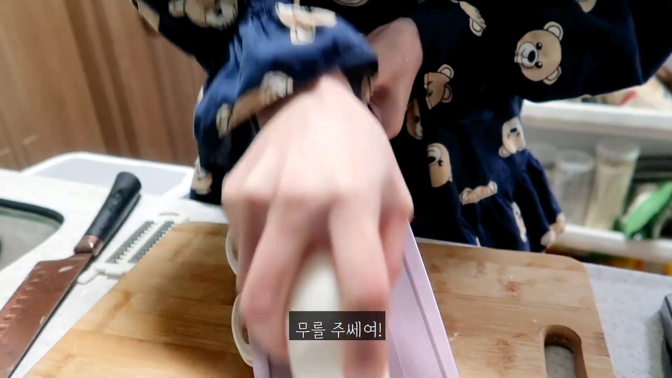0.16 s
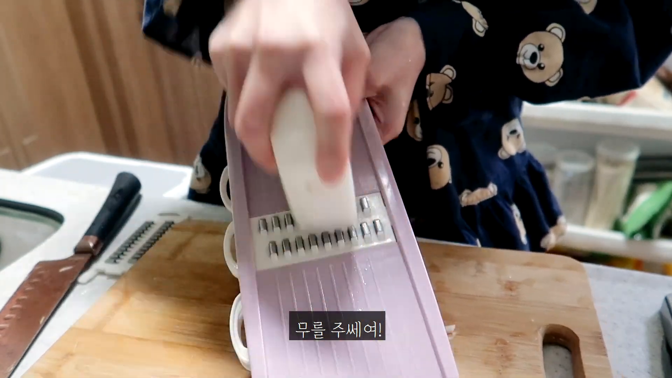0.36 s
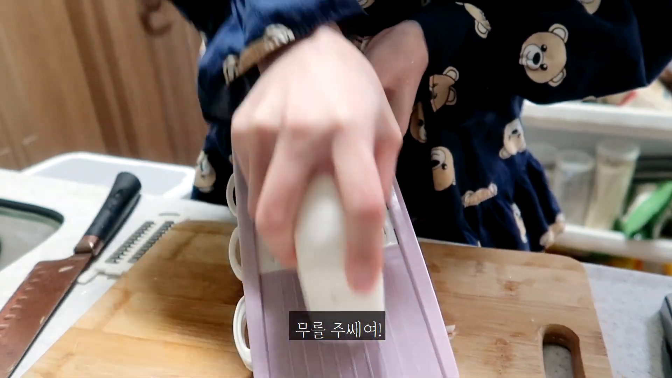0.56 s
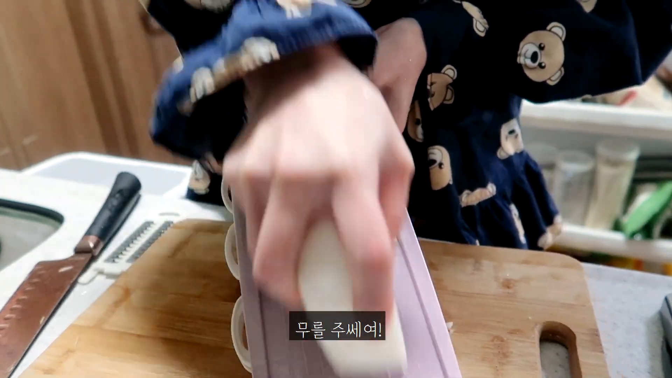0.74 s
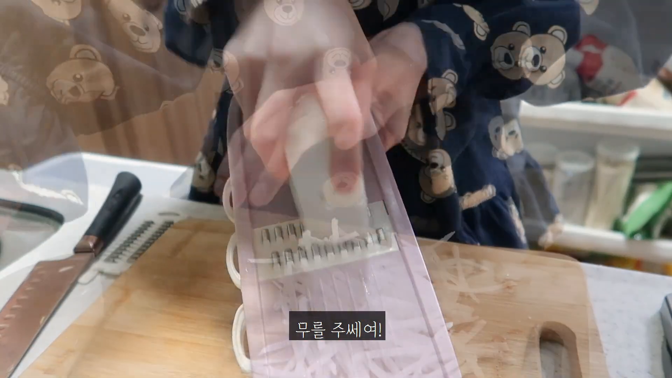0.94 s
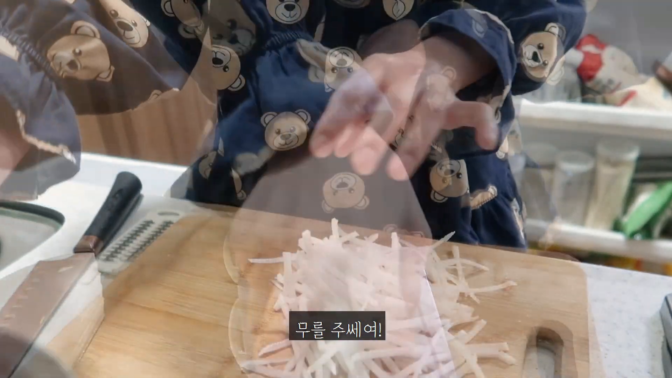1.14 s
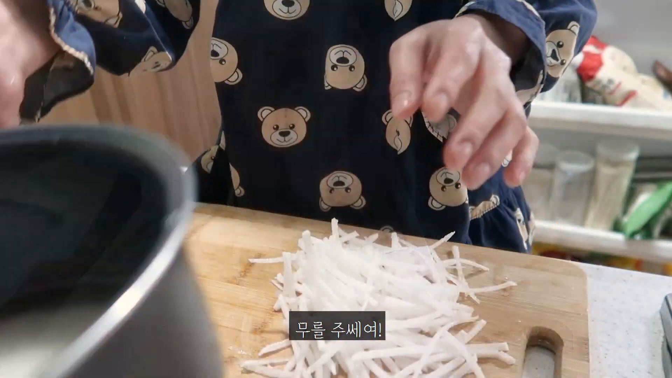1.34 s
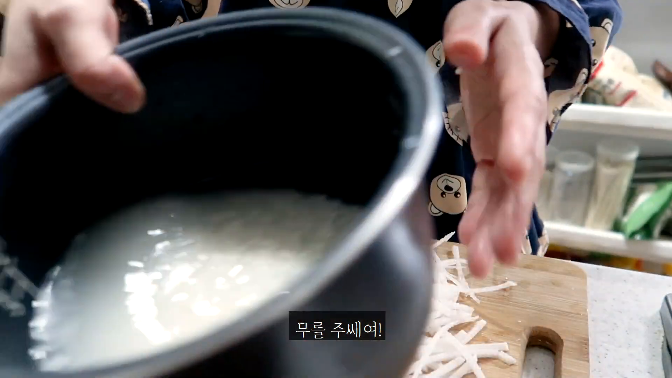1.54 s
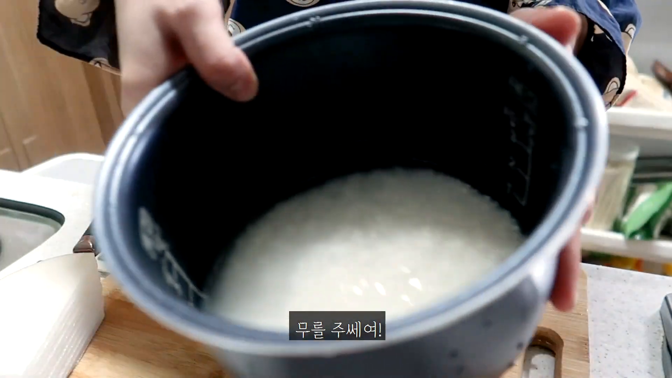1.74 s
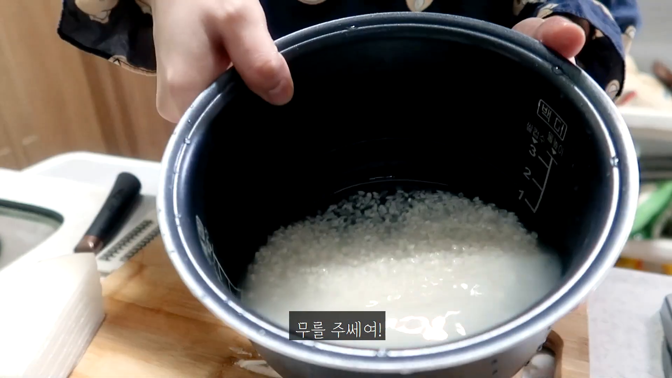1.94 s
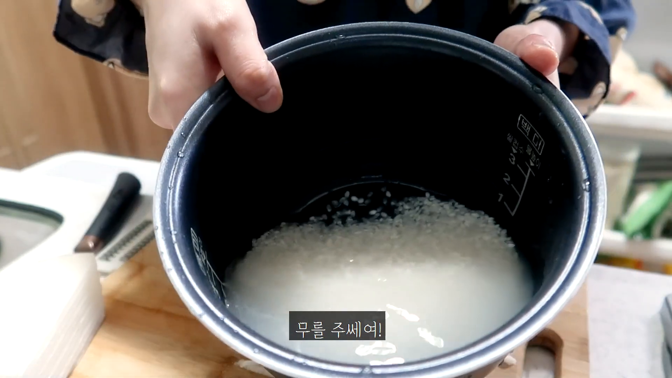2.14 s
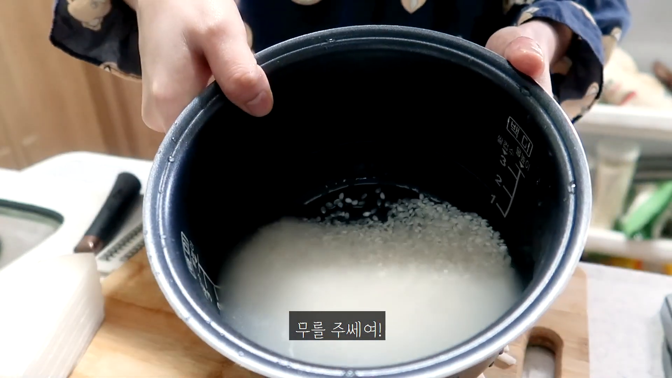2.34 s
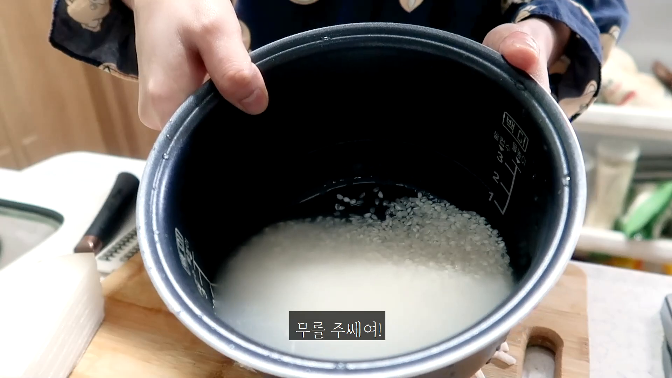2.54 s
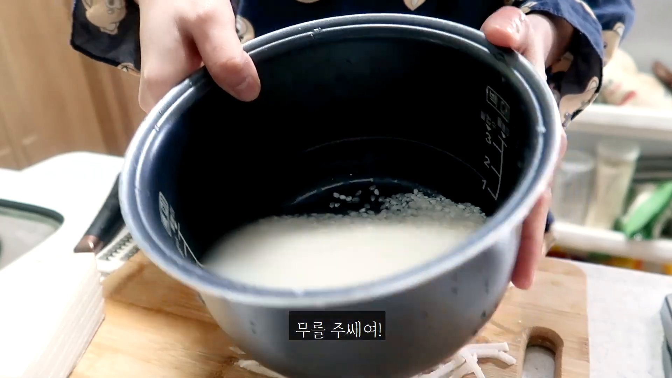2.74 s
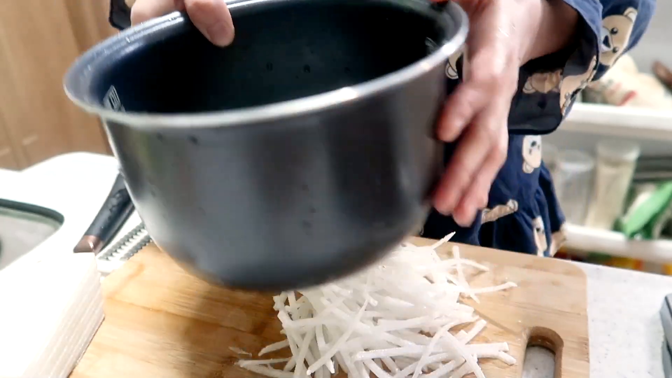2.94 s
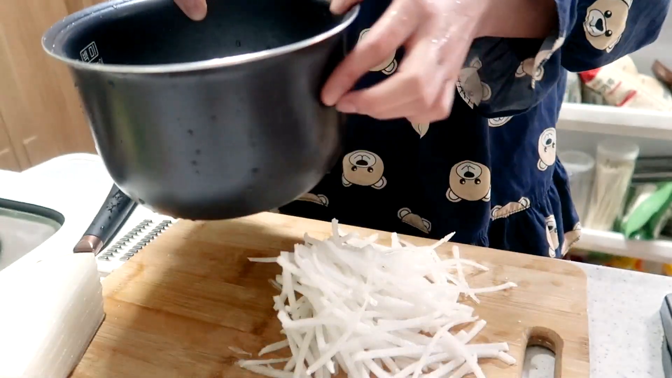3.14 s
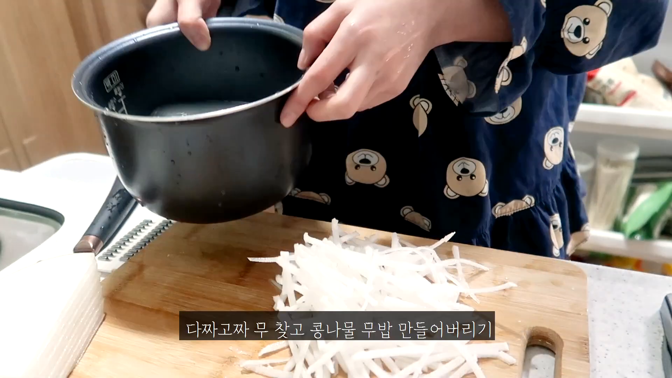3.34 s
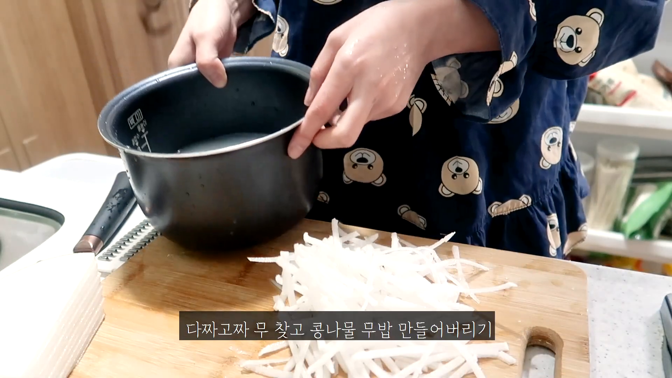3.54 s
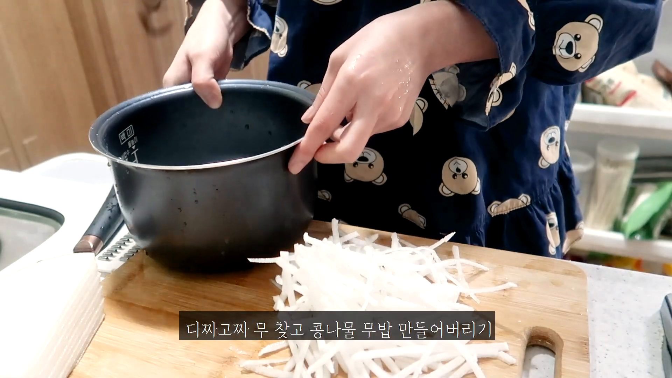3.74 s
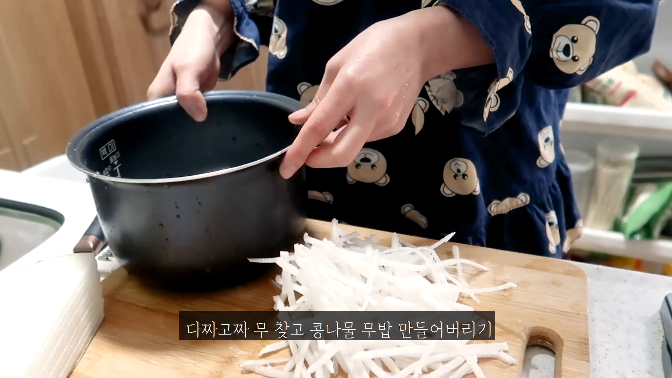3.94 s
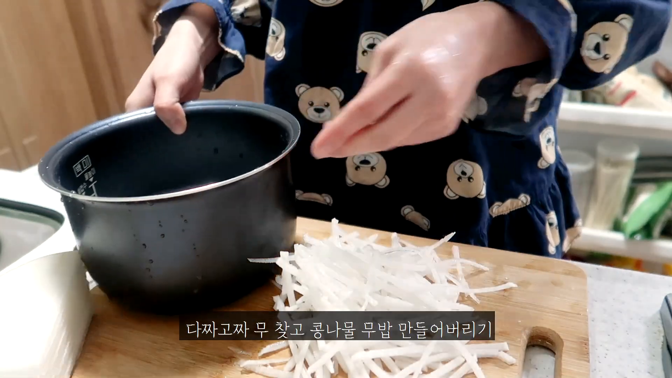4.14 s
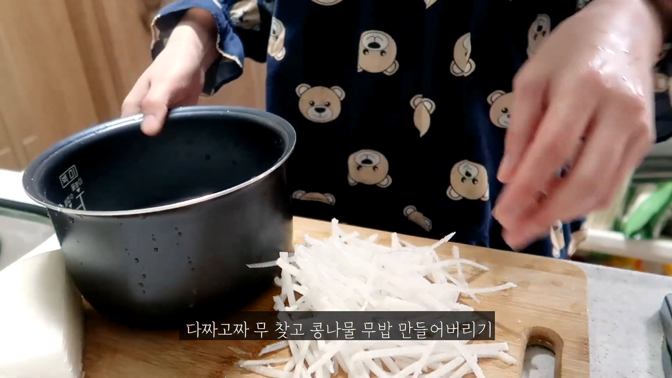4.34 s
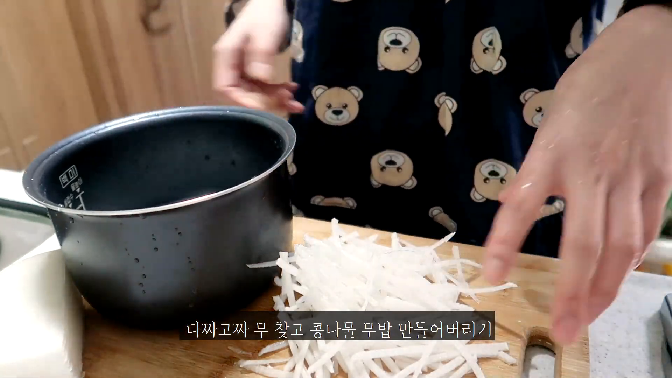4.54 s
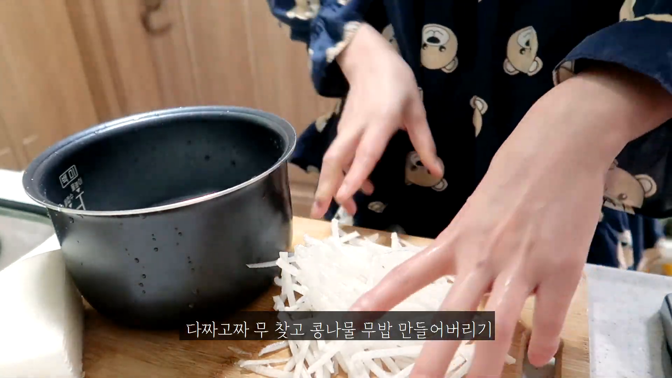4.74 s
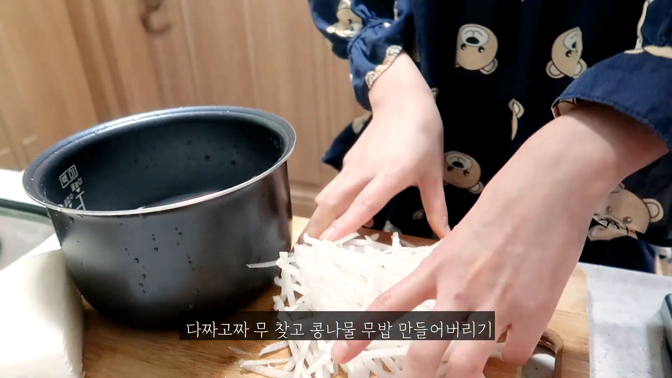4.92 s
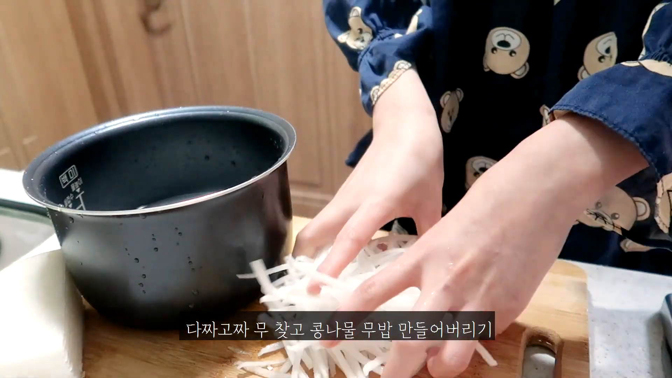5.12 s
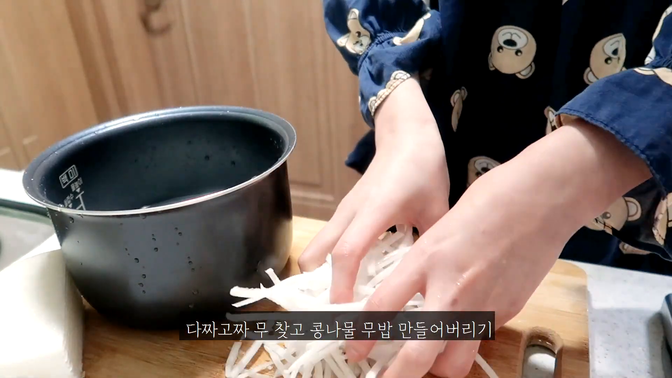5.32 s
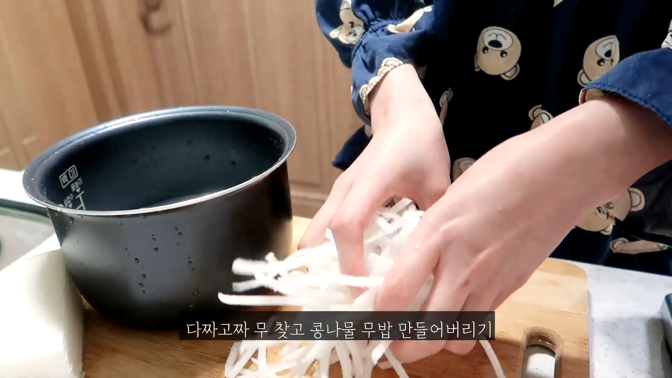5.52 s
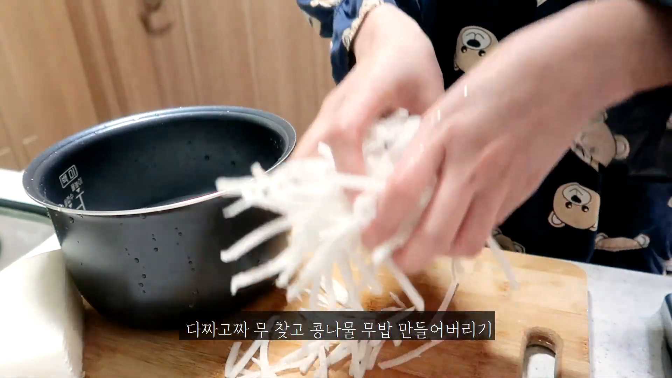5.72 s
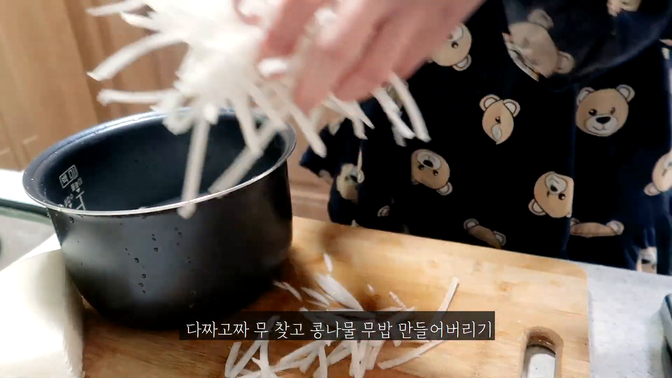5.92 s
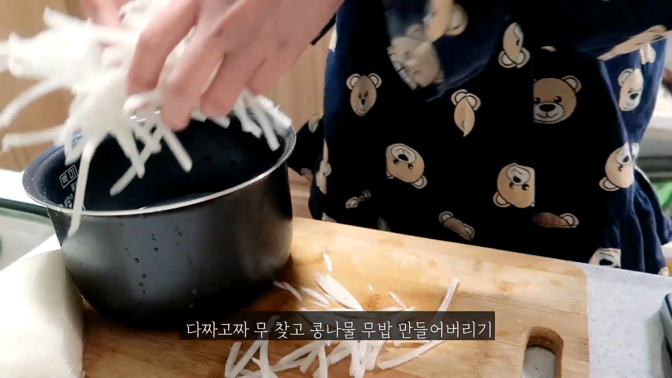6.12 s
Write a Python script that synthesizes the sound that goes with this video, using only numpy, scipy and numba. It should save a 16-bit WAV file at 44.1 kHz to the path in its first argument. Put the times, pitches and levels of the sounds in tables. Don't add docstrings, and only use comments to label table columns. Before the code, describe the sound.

From 0 to 1.1 seconds a radish is rasped fast over the blades of a plastic slicer, very close: four strong crunchy strokes at about 0.15, 0.6 and 1.05 seconds plus the very start, with lighter return drags between. Hollow plastic knocks stand out near 0.07, 0.53 and 0.74, with a low frame hum. The grating is chopped off at 1.14; a small bump follows at 1.2. From 1.8 to 3.5 sparse, dry finger ticks touch a metal pot, clearest around 2.4 to 2.8. At 3.72 the pot lands with the loudest, hard woody thud and a tiny bounce, then slides softly, with a duller push at 4.12. From 4.9 to 5.5 hands grab wet shreds in short soft rustles, crackles and ticks, fading into a faint drag. Quiet fridge hum and room hiss continue throughout, with a short room tail.

```python
import sys
import numpy as np
from scipy import signal
from scipy.fft import rfft, irfft, next_fast_len
from scipy.io import wavfile
from scipy.ndimage import uniform_filter1d
from numba import njit

SR = 44100
rng = np.random.default_rng(int(sys.argv[2]) if len(sys.argv) > 2 else 0)


def volts_from_decibels(level):
    exponent = np.asarray(level, float) / 20
    return 10 ** exponent


def store_pcm(level_fs):
    pcm = np.round(np.clip(level_fs, -1, 1) * 32767).astype(np.int16)
    wavfile.write(sys.argv[1], SR, np.atleast_2d(pcm).T)


N = 276507
T = np.arange(N) / SR
CUT_S = 1.138
SHRED = int(1.2 * SR)

# frequency in Hz, level in dB per Hz.
KITCHEN_HISS = [(12, -13.5), (20, -10), (49, -35.5), (70, -7), (122, -1), (144, -9.5), (274, -13),
                (324, -21), (416, -16.5), (581, -23), (725, -22), (1410, -29.5), (3640, -37.5),
                (11700, -53.5), (15500, -62.5)]
KITCHEN_DB = -46.5
# frequency in Hz, width in Hz, level in dB.
FRIDGE_HUMS = [(81.2, 15.6, -54.5), (121.2, 11, -54), (756, 54, -67)]

# start in seconds, length in seconds, rustle in dB, brightness in dB, rumble in dB.
DRAGS = [
    (3.743, 0.031, -48.5, -17, -27.5),
    (3.85, 0.29, -60.5, -12.5, -56),
    (4.128, 0.27, -54.5, -9.5, -44.5),
    (4.72, 0.095, -63, -4.5, -51),
    (5.65, .7, -61, -34, -62),
]
DRAG_ATTACK_S, DRAG_RELEASE_S = 0.081, 0.057
# start in seconds, length in seconds, rustle in dB, brightness in dB, rumble in dB.
GRABS = [
    (1.158, 0.021, -55, -1, -54),
    (1.197, 0.0059, -48, 3.5, -32.5),
    (1.256, 0.097, -79, 5.5, -71),
    (4.118, 0.0078, -54, -14, -28),
    (4.938, 0.056, -62, -10, -43.5),
    (5.023, .04, -52.5, -9.5, -45),
    (5.106, 0.031, -47.5, -15, -40),
    (5.212, 0.094, -51, -11, -40),
    (5.352, 0.025, -56, -11, -45.5),
    (5.414, .11, -54.5, -12.5, -49),
]
GRAB_ATTACK_S, GRAB_RELEASE_S = 0.0032, 0.031
# frequency in Hz, level in dB per Hz.
RUSTLE = [(410, -43.5), (700, 9), (877, -0.5), (958, 1.5), (1090, -0.5), (1750, -3), (1980, -10.5),
          (2250, -6), (3310, -17), (4000, -19), (4360, -22.5), (10100, -39.5), (14000, -38.5)]
# frequency in Hz, level in dB per Hz.
RUMBLE = [(41, -39), (70, -19), (172, 9.5), (237, -7.5), (275, 2), (435, -9), (505, -4.5), (900, -30.5),
          (1170, -67), (1980, -120)]
SLIDE_S, SLIDE_SPAN_S, SLIDE_HZ, SLIDE_DB = 4.295, 0.049, 3800, -64.5
SWISH_S, SWISH_SPAN_S, SWISH_HZ, SWISH_DB = 4.2, 0.085, 3100, -58

# time in seconds, peak in dB, centre in Hz, snap in dB.
TICKS = [(1.187, -41, 1220, 3), (1.2149, -38.5, 2460, 10.5), (1.271, -35, 2770, -33),
         (1.848, -50, 1360, -23), (1.886, -40.5, 3430, -38), (1.9693, -35, 2450, -40),
         (2.1488, -45.5, 1250, -18), (2.4198, -29, 2400, -43), (2.45, -38.5, 3600, -35),
         (2.5262, -44, 3000, -35), (2.6792, -29.5, 1880, -7), (2.8267, -27, 2620, -18),
         (3.012, -40.5, 3100, -2), (3.103, -48.5, 1550, -29), (3.453, -40, 3980, -20),
         (4.946, -47, 2930, -6), (5.027, -37, 2000, -7.5), (5.113, -40, 2200, -16),
         (5.2082, -35, 1710, -19), (5.358, -40.5, 1750, -22), (5.5074, -37.5, 1290, -20)]
RATTLE_S = 0.0036

# time in seconds, level in dB, contact in ms, share of the ring left by the resting pot.
BLOWS = [
    (3.722, -7, 0.36, 1),
    (3.741, -15, 1.44, 0.33),
    (4.122, -20, 3.8, 0.39),
    (4.142, -38, 2.2, 0.48),
    (4.254, -30.5, 3.2, 0.73),
    (4.948, -31.5, 6.7, 0.49),
    (5.209, -36, 6.8, 0.61),
]
# frequency in Hz, level in dB, time to fade by 60 dB in seconds.
BOARD_MODES = [(81, -14.5, 0.13), (114.4, -5.5, 0.17), (183, -5, 0.077), (288, -9, 0.089),
               (377, -5.5, 0.087), (526, -9.5, 0.077), (676, -7.5, 0.047), (803, -7.5, 0.036),
               (908, 3.5, 0.019), (1084, -3.5, 0.011), (1320, 1.5, 0.011), (1687, 4, 0.013),
               (2320, -3.5, 0.0045)]
# time in seconds, frequency in Hz, level in dB, time to fade by 60 dB in seconds.
LONE_RINGS = [(1.202, 549, -27.5, 0.091), (1.203, 787, -21.5, 0.019), (1.203, 420, -40, 0.11),
              (4.122, 278, -28.5, 0.13), (5.045, 509, -39.5, 0.14), (5.065, 598, -41.5, 0.11),
              (5.085, 520, -37, 0.086), (3.51, 2200, -57.5, 0.083), (3.508, 2980, -57, 0.14),
              (4.951, 2960, -56.5, 0.33), (4.948, 3660, -62, 0.26), (4.948, 5080, -65, 0.18),
              (4.948, 7540, -60, .04), (5.86, 2360, -58.5, 0.26)]

# start in seconds, length in seconds, rasp in dB, swell over the stroke in dB, fibre hiss in dB.
STROKES = [(-.02, 0.041, -38, -3.5, -7.5), (0.039, 0.012, -32.5, 10, -19.5), (0.123, 0.017, -49, 14, -10.5),
           (0.144, 0.14, -31, -3, -17), (0.293, .12, -50, -7, -21), (0.423, .1, -45, -3, -22.5),
           (0.586, .14, -30, 0, -15.5), (0.746, 0.033, -42, 2, -20), (0.796, 0.087, -50, -4, -23.5),
           (0.879, 0.12, -46.5, -11, -20.5), (1.0, .02, -35.5, 17, -28), (1.027, 0.11, -30, 6, -13.5)]
BITE_S, LIFT_S = 0.0021, 0.007
# frequency in Hz, level in dB per Hz.
RASP = [(150, -36.5), (250, -28), (346, 1.5), (439, -33), (530, -3), (763, -13.5), (843, -20), (993, -1.5),
        (1560, 10.5), (1930, -0.5), (2540, 2.5), (5000, -10), (6500, -44), (11000, -120)]
# frequency in Hz, level in dB per Hz.
FIBRE = [(2000, -25.5), (3500, -4), (4900, -5), (6500, -10.5), (8500, -16.5), (9800, -18.5), (11200, -17.5),
         (12300, -17.5), (14800, -20), (15300, -18), (15600, -67)]
# frequency in Hz, width in Hz, level in dB.
PLATE_MODES = [(1070, 210, 3.5), (1430, 920, -13), (2197, 66, 1.5), (2870, 300, -35), (3260, 750, 6)]
# time in seconds, knock in dB, hum above it in dB, contact in ms, pitch factor.
KNOCKS = [(0.039, -24.5, 0, 4.6, 0.83), (0.068, -11, -6.5, 1.45, 1.01), (.171, -28.5, -23, 2.2, 0.73),
          (0.264, -22.5, -2.5, 6, 0.85), (0.431, -26, 10, 3.6, 1.01), (0.469, -35, 6, 1.9, 1.2),
          (0.497, -27, 7, 1.5, 0.9), (0.53, -7.5, -9, 1.74, 1.055), (.744, -13.5, -8.5, 2, 1.21),
          (0.839, -37.5, 8, 1.4, 1.3), (0.887, -29.5, 4, 2.9, 0.83), (.975, -26.5, 2, 3.8, 0.97),
          (1.006, -23.5, 1, 1.9, 0.74), (1.079, -25.5, -33, 0.87, 1.8)]
# frequency in Hz, level in dB, time to fade by 60 dB in seconds.
KNOCK_MODES = [(1162, -16, 0.12), (1353, 14.5, 0.015), (1693, -1.5, 0.031), (2200, 1.5, 0.018),
               (3050, -3, 0.012), (4200, -64, 0.012)]
HUM_HZ, HUM_T60_S = 177.2, 0.21
DEEP_HISS_DB, BLADE_HZ, DEEP_HZ, FRAME_DB = 3, 2380, 344, -10.5
CRUNCH_DB = -9
SCUFF_DB, SCUFF_S = -20.5, 0.019

# frequency in Hz, level in dB.
FAR_PORTS = [(60, -46), (110, -42), (200, -10), (380, -2), (700, -10), (1290, -2.5), (2380, -3.5),
             (4400, -0.5), (8120, -1), (15000, -2)]
# frequency in Hz, level in dB.
NEAR_PORTS = [(60, -41), (110, -50), (200, -49), (380, -19), (700, -35.5), (1290, -31), (2380, -16),
              (4400, -6), (8120, 3.5), (15000, 4)]
ROOM_T60_S, ROOM_DB, ROOM_HZ = 0.23, -16.5, 3000
DUCK_DB, DUCK_S = 5.5, 0.39


def unit(x):
    return x / np.sqrt(np.mean(x ** 2))


def add(out, s, x):
    i = int(s * SR)
    out[i:i + len(x)] += x[:N - i]


def gain_at(points, size):
    hz, db = np.transpose(points)
    grid_hz = np.fft.rfftfreq(size, 1 / SR)
    return np.interp(np.log(grid_hz + 1), np.log(hz + 1), db) * np.log(10) / 20


def colour(x, points):
    cepstrum = irfft(gain_at(points, size=4096))
    cepstrum[1:2048] *= 2
    cepstrum[2049:] = 0
    return signal.oaconvolve(x, irfft(np.exp(rfft(cepstrum))))[:len(x)]


def band(x, lo_hz, hi_hz):
    return signal.sosfilt(signal.butter(1, (lo_hz, min(hi_hz, 20000)), "band", fs=SR, output="sos"), x)


def cut(x, order, hz, kind="low"):
    return signal.sosfilt(signal.butter(order, hz, kind, fs=SR, output="sos"), x)


@njit
def spin(x, pole):
    y, z = np.empty(len(x)), 0j
    for i in range(len(x)):
        z = z * pole[i] + x[i] + 1e-18
        y[i] = z.imag
    return y


def ring(x, hz, t60):
    decay = np.log(1000) / max(t60, 5e-4)
    return spin(x, np.exp((2j * np.pi * hz - decay) / SR) * np.ones(len(x)))


def walk(rate, size=N):
    k = int(SR / rate)
    held = np.repeat(rng.standard_normal(size // k + 1), k)
    return uniform_filter1d(uniform_filter1d(held, k), k)[:size]


def crackle(rate, spread_db, hiss, size):
    snaps, count = np.zeros(size), int(size / 8)
    when, big, sign = rng.random(count), rng.exponential(size=count), rng.standard_normal(count)
    some = slice(int(rate * size / SR))
    snaps[(when[some] * size).astype(int)] = volts_from_decibels(spread_db * np.minimum(big[some], 5)) * sign[some]
    return unit(snaps) + hiss * rng.standard_normal(size)


def tearing(rate, t60, top_hz, size):
    pitch = 600 + top_hz * rng.random((6, size // 400 + 1)) ** 1.5
    pitch = np.repeat(pitch, 400, axis=1)[:, :size]
    return unit(sum(ring(crackle(rate, 1.43, 0.46, size), hz, t60) for hz in pitch))


def contact(start, length, attack, release):
    since = T - start
    gain = np.clip(since / attack, 0, 1) * np.exp(-np.maximum(since - length, 0) / release)
    return gain, np.clip(since / length, 0, 1)


def kitchen():
    waver = volts_from_decibels(0.7 * walk(6))
    out = unit(colour(rng.standard_normal(N) * waver, KITCHEN_HISS)) * volts_from_decibels(KITCHEN_DB - 4)
    for hz, width, db in FRIDGE_HUMS:
        hum = unit(ring(rng.standard_normal(N), hz, 3.1 / width))
        out += volts_from_decibels(db + 1.5 * walk(9.2)) * hum
    return out


def handling():
    touches = [(row, DRAG_ATTACK_S, DRAG_RELEASE_S) for row in DRAGS]
    touches += [(row, GRAB_ATTACK_S, GRAB_RELEASE_S) for row in GRABS]
    gains = np.zeros((3, N))
    for (s, length, db, bright_db, rumble_db), attack, release in touches:
        levels = volts_from_decibels(np.array([[db], [db + bright_db], [rumble_db]]))
        gains += levels * contact(s, length, attack, release)[0]
    return gains


def hands():
    grains = crackle(870, 2.3, 2.05, N) * volts_from_decibels(walk(40))
    add(grains, 4.9, 0.42 * tearing(120, 0.034, 4010, SR))
    rustle = unit(colour(grains, RUSTLE))
    bright = unit(cut(rustle, 2, 3200, "high"))
    rumble = unit(colour(rng.standard_normal(N) * volts_from_decibels(2 * walk(30)), RUMBLE))
    soft_gain, bright_gain, rumble_gain = handling()
    out = volts_from_decibels(-1) * cut(rustle, 2, 3600) * soft_gain
    out -= volts_from_decibels(3) * bright * bright_gain
    whistle = unit(ring(grains, SLIDE_HZ * (1 + 0.015 * walk(60)), 0.012))
    out += volts_from_decibels(SLIDE_DB) * whistle * np.exp(-((T - SLIDE_S) / SLIDE_SPAN_S) ** 2)
    swish = unit(ring(grains, SWISH_HZ, 0.0032))
    out += volts_from_decibels(SWISH_DB) * swish * np.exp(-((T - SWISH_S) / SWISH_SPAN_S) ** 2)
    return out + volts_from_decibels(-5) * rumble * rumble_gain


def ticks():
    out, t = np.zeros(N), np.arange(1024) / SR
    for s, db, hz, snap_db in TICKS:
        rattle = rng.standard_normal(1024) * np.exp(-t / RATTLE_S)
        click = (t == 0) + 0.1 * rattle
        body = band(band(band(click, 0.6 * hz, 1.7 * hz), 0.45 * hz, 2 * hz), 0.2 * hz, 2.5 * hz)
        snap = band(band(rattle, 3500, 8000), 3000, 11000)
        tick = body / np.abs(body).max() + volts_from_decibels(snap_db) * snap / np.abs(snap).max()
        add(out, s, volts_from_decibels(db) * tick)
    return out


def board():
    out, t = np.zeros(N), np.arange(12000) / SR
    for s, db, ms, left in BLOWS:
        push = np.sin(np.pi * np.minimum(t * 1e3 / ms, 1)) ** 2
        thud = np.zeros(len(t))
        for k, (hz, mode_db, t60) in enumerate(BOARD_MODES):
            thud -= (-1) ** k * volts_from_decibels(mode_db) * ring(push, hz, left * t60)
        crack = band(band(rng.standard_normal(12000), 2200, 3400), 1200, 3600)
        crack *= np.exp(-t / 0.0013) + 0.081 * np.exp(-t / 0.032)
        add(out, s, volts_from_decibels(db) * (thud / np.abs(thud).max() + 0.085 * crack / ms ** 2))
    for s, hz, db, t60 in LONE_RINGS:
        add(out, s, volts_from_decibels(db - 60 * t / t60) * np.sin(2 * np.pi * hz * t) * (1 - np.exp(-t / 0.00078)))
    return out


def stroking():
    rasp, hiss, depth = np.zeros((3, N))
    for s, length, db, swell_db, hiss_db in STROKES:
        gain, progress = contact(s, length, BITE_S, LIFT_S)
        deep = np.sin(np.pi * progress) ** 2
        gain = gain * volts_from_decibels(db + swell_db * (progress - 0.5))
        rasp += gain
        hiss += gain * volts_from_decibels(hiss_db + DEEP_HISS_DB * deep)
        depth += deep
    scuff = sum(volts_from_decibels(row[1] + SCUFF_DB) * contact(row[0], BITE_S, BITE_S, SCUFF_S)[0] for row in KNOCKS)
    return (rasp + scuff)[:SHRED], (hiss + volts_from_decibels(-19) * scuff)[:SHRED], depth[:SHRED]


def knocks():
    out, t = np.zeros(N), np.arange(8192) / SR
    hum = np.sin(2 * np.pi * HUM_HZ * t) * volts_from_decibels(-60 * t / HUM_T60_S) * np.clip((t - 0.006) / 0.016, 0, 1)
    for s, db, hum_db, ms, pitch in KNOCKS:
        push = rng.standard_normal(8192) / np.cosh((t - 0.01) * 1e3 / ms)
        knock = sum(volts_from_decibels(d) * ring(push, hz * pitch, t60) for hz, d, t60 in KNOCK_MODES)
        crack = band(band(push, 1400, 3600), 1000, 4500)
        knock = knock / np.abs(knock).max() + 0.35 * crack / np.abs(crack).max()
        add(out, s - 0.011, volts_from_decibels(db) * (knock + volts_from_decibels(hum_db) * hum))
    return out


def slicer():
    snaps = crackle(3000, 2.9, 1.0, SHRED) + 0.56 * tearing(400, 0.015, 7973, SHRED)
    snaps *= volts_from_decibels(1.96 * walk(90.44, SHRED))
    plain = unit(colour(snaps, RASP))
    plate = sum(volts_from_decibels(db) * unit(ring(plain, hz, 1.17 / width)) for hz, width, db in PLATE_MODES)
    rasp, hiss, depth = stroking()
    blade_hz = (BLADE_HZ + DEEP_HZ * depth) * (1 + 0.17 * walk(60.8, SHRED))
    blade = unit(ring(plain, blade_hz, 0.024))
    out = unit(plain + 0.51 * plate + 0.57 * blade) * rasp
    crunch = unit(band(band(snaps, 2530, 3600), 2120, 3920))
    out += volts_from_decibels(CRUNCH_DB) * crunch * rasp * np.sqrt(depth)
    out += volts_from_decibels(5) * unit(colour(snaps, FIBRE)) * hiss
    out += volts_from_decibels(FRAME_DB) * unit(ring(rng.standard_normal(SHRED), HUM_HZ, 0.06)) * rasp
    return out + knocks()[:SHRED]


def ports(mid, side_db, share):
    size = 2 * next_fast_len(N // 2 + 1)
    turn = np.fft.ifft(2 * rfft(mid, size) * np.exp(gain_at(side_db, size=size)), size)[:N]
    scattered = (turn * np.exp(4j * walk(150))).real
    side = np.sqrt(share) * turn.imag + np.sqrt(1 - share) * scattered
    return np.array([mid - side, mid + side])


def room_echo(x, tail):
    return signal.oaconvolve(x, tail / np.linalg.norm(tail))[:len(x)]


def scene():
    t = np.arange(SR // 3) / SR
    tail = rng.standard_normal(len(t)) * volts_from_decibels(-60 * t / ROOM_T60_S) * (1 - np.exp(-t / 0.0012))
    tail = cut(tail, 1, ROOM_HZ)
    strokes, thuds, clicks = slicer(), board(), ticks()
    near = thuds + clicks + hands()
    near += room_echo(volts_from_decibels(ROOM_DB - 1) * thuds + volts_from_decibels(ROOM_DB + 7) * clicks, tail)
    strokes = strokes + volts_from_decibels(ROOM_DB - 2) * room_echo(strokes, tail)
    add(near, 0, strokes * np.interp(T[:SHRED], (CUT_S, CUT_S + 0.002), (1, 0.05)))
    near = cut(near, 2, 55, "high")
    since = T - BLOWS[0][0]
    duck = volts_from_decibels(-DUCK_DB * (since > 0) * np.exp(-(since / DUCK_S) ** 2))
    return ports(near, NEAR_PORTS, 0.25) + ports(kitchen() * duck, FAR_PORTS, 0.15)


def roll_off(x):
    return signal.sosfilt(signal.butter(12, 16040, fs=SR, output="sos"), x)


def record(dry):
    return roll_off(dry)


dry = scene()
out = record(dry)
store_pcm(out)
```